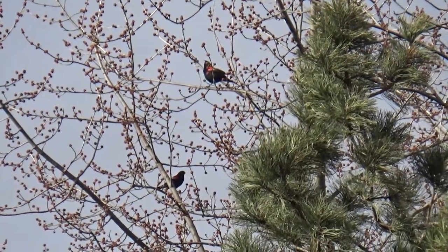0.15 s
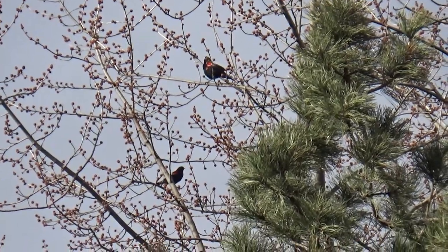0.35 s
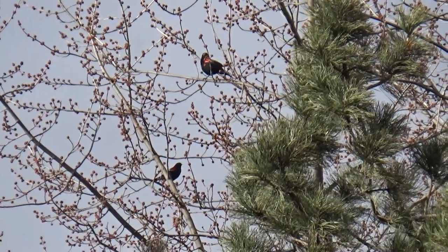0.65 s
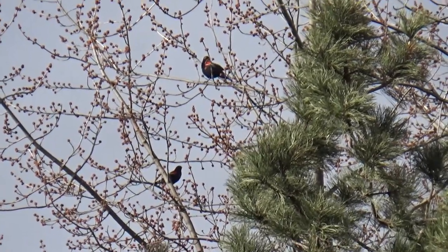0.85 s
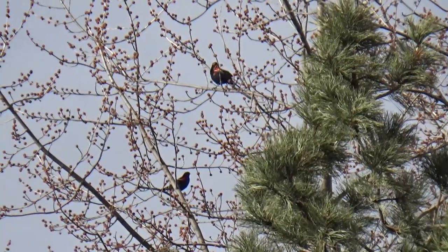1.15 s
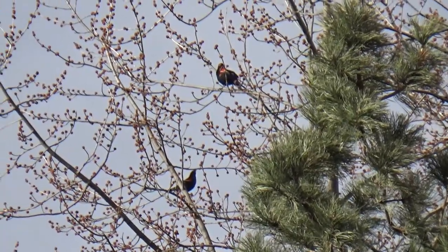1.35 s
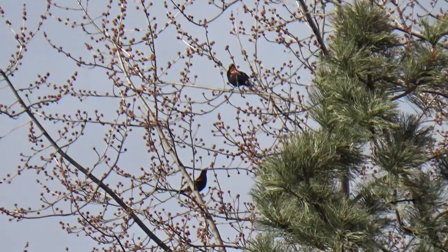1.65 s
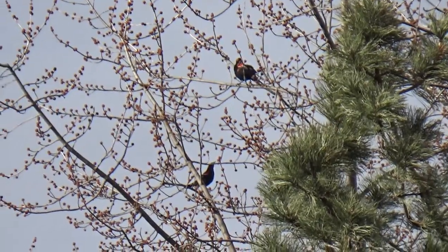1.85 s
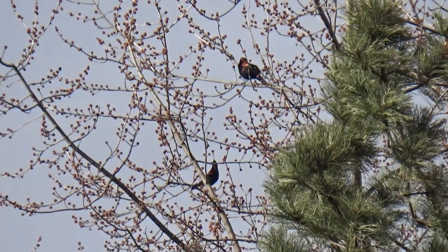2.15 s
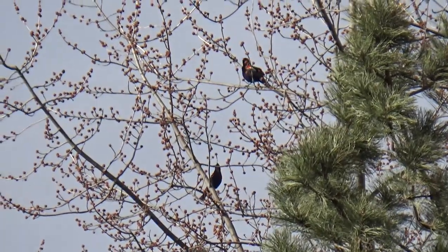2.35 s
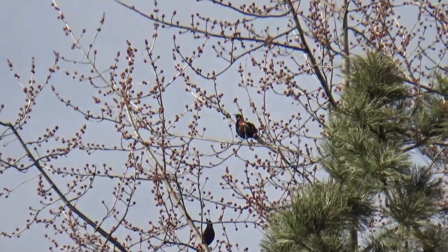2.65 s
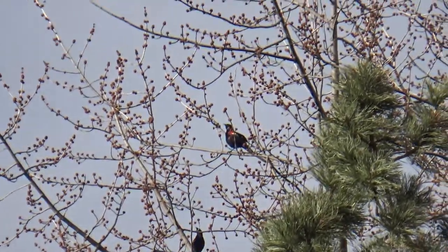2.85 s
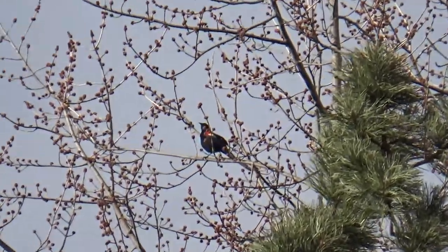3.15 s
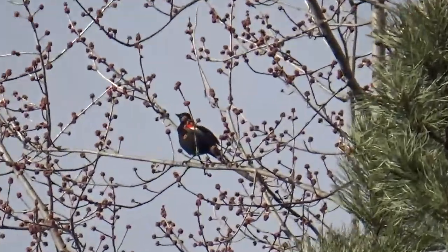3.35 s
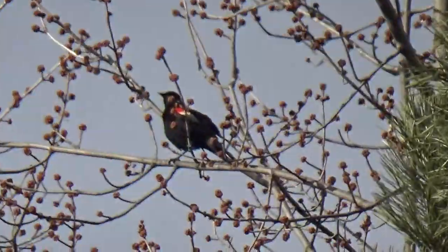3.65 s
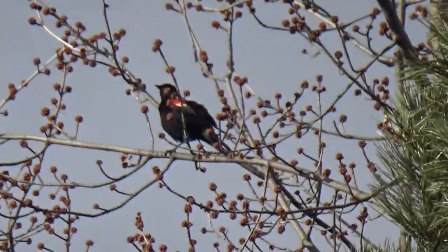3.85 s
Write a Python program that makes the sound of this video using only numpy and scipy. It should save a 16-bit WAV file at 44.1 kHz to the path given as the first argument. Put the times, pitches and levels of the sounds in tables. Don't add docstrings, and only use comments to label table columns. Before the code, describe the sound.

A blackbird in bare trees finishes its song with a harsh, rapid buzzing trill lasting just over half a second; afterwards a car recedes over low traffic, with camera ticks, a tiny chip and faint far whistles.

```python
import sys
import numpy as np
from scipy import signal
from scipy.fft import rfft, irfft
from scipy.io import wavfile
from scipy.ndimage import uniform_filter1d

SR = 44100
rng = np.random.default_rng(int(sys.argv[2]) if len(sys.argv) > 2 else 0)


def gain_from_db(level_db):
    decades = np.asarray(level_db, float) / 20
    return 10 ** decades


def pcm_store(signal):
    levels = np.round(np.clip(np.atleast_2d(signal), -1, 1) * 32767)
    wavfile.write(sys.argv[1], SR, levels.astype(np.int16).T)


N = 176400

# [f/Hz, level/dB per Hz]
TRAFFIC_COLOUR = [(25, -21), (70, -15), (210, 0.5), (420, -4.5), (700, -4), (1300, -9.5), (2500, -18),
                  (5000, -50)]
# [f/Hz, level/dB per Hz]
BREEZE_COLOUR = [(1500, 4), (3500, 1), (5500, -5), (8500, -3.5), (11000, -16), (15500, -12.5)]
# [t/s, level/dB]
BREEZE_FADER = [(0, -56), (.7, -63.5), (1.6, -65.5), (2.6, -67.5), (4, -66)]
# [f/Hz, correlation]
EAR_LIKENESS = [(60, 0.97), (300, 0.99), (700, 0.97), (1500, 0.58), (3500, 0.079), (7000, 0.58),
                (9000, 0.8), (11000, 1)]
# [t/s, level/dB, centre of tyre roar f/Hz]
CAR_PASSAGE = [
    (0, -53.5, 748),
    (.6, -50, 852.6),
    (1.2, -52.5, 1050),
    (1.8, -55.5, 1150),
    (2.4, -57, 1193),
    (3, -61.5, 1087),
    (4, -61.5, 1104),
]
# [f/Hz, level/dB per Hz]
CAR_COLOUR = [(100, -19.5), (500, -7), (1000, 0), (2000, -12.5), (3500, -23.5), (7000, -35)]
# [t/s, level/dB]
WIND_PUFFS = [
    (0.211, -42.5),
    (0.859, -49),
    (1.171, -47),
    (2.719, -56),
    (2.949, -61.5),
    (3.539, -65),
    (3.639, -54.5),
    (3.74, -49.5),
    (3.979, -123),
]
# [t/s, level/dB, ring f/Hz, crack level/dB, crack top f/Hz]
CAMERA_TICKS = [
    (.7894, -30, 8200, -5, 15000),
    (1.3995, -39, 5500, 2, 10500),
    (1.4648, -39, 4400, 2, 10000),
    (2.8912, -35, 1680, -4, 3000),
    (2.957, -45, 4700, -2, 7500),
    (3.708, -45, 6300, -1, 9000),
]
# [t/s, level/dB]
ZOOM_FADER = [
    (0, -64),
    (2.8, -75),
    (3, -72),
    (3.3, -85.5),
    (3.75, -65),
    (3.9, -89),
    (4, -154),
]
# [t/s, length/s, first f/Hz, last f/Hz, level/dB]
FAR_WHISTLES = [
    (3.652, .115, 2420, 2370, -63),
    (3.815, .08, 1270, 1230, -63),
    (3.927, .036, 2410, 2510, -45),
    (3.95, .075, 2540, 2510, -50),
    (3.965, .05, 2400, 2300, -57),
    (3.94, .045, 3760, 3800, -62),
    (3.93, .02, 7300, 7200, -70),
]
# [first f/Hz, last f/Hz, level/dB]
CHIP_PARTIALS = [(4150, 4550, -1), (3650, 3850, -10), (3000, 3150, -14), (8100, 8300, -26),
                 (12200, 12100, -25)]
# [t/s, length/s, first f/Hz, last f/Hz, level/dB]
LEAD_IN_NOTES = [
    (-.02, .045, 3300, 2620, -40),
    (-.02, .039, 4300, 5350, -45),
    (.0168, .008, 4100, 5450, -33),
    (.0235, .007, 3560, 3480, -28),
    (.031, .006, 4900, 3400, -27),
    (.024, .011, 7300, 6700, -54),
]
# [share of the beat, pitch f/Hz, level/dB]
TRILL_BEAT = [(0, 2868, -8.5), (.13, 2945, 4.5), (0.191, 5256, -3), (.3, 3565, -4.5), (.38, 4643, -2.5),
              (.47, 5267, -13), (.56, 5092, -5), (.7, 3429, 3), (0.789, 2903, -3), (.87, 2745, -2.5),
              (0.951, 2427, -7.5)]
OVERTONES = (-18.5, -23.5)
# [f/Hz, gain/dB]
THROAT_COLOUR = [(1800, -6), (2350, 5.5), (2850, -3.5), (4200, -4.5), (5300, 2), (5700, 2.5), (7000, -24)]
# [f/Hz, gain/dB]
SHEEN_COLOUR = [(5000, -3.5), (6800, -5.5), (7900, -13.5), (8700, -3), (9400, -1.5), (10500, -40),
                (13000, -20), (15000, -8)]
# [f/Hz, width/Hz, boost/dB]
TRILL_PEAKS = [(2345, 70, 3), (2700, 70, 5), (2880, 70, 6), (3510, 70, 7), (4830, 150, 2), (5230, 150, 5)]

TRAFFIC_DB, TRAFFIC_FOLLOWS = -52, 0.55
CAR_WIDTH_HZ, CAR_PAN_DB, ROAR_DB = 403, -8.5, -4.5
PUFF_S, PUFF_HZ = 0.037, (67, 159)
TICK_T60_S, RING_CYCLES, TICK_RISE_S = .02, 20., .0004
ZOOM_HZ, ZOOM_WIDTH_HZ = 9000, 3000
WHINE_HZ, WHINE_DB = 7900, -81
GROUND_S, GROUND_DB = .00594, -4.5
TWIGS_DB, TWIGS_T60_S = -8, .08
WALLS_DB, WALLS_T60_S, WALLS_CUT_HZ = -18, .5, 2500
FAR_FLUTTER_DB, NEIGHBOUR_WET_DB = 3, 8
CHIP_START_S, CHIP_LENGTH_S, CHIP_DB, CHIP_ROUGH = 2.003, .022, -40.5, .45
CHIP_BREATH_DB, CHIP_BREATH_HZ = -10, (3200, 5000)
BEATS_PER_S, SLOWING_PER_S2, BEAT_PHASE = 69.48, 7.81, -.836
PITCH_WOBBLE, LEVEL_WOBBLE_DB, TIMING_WOBBLE, SLOW_WANDER = .011, 1.5, .018, .006
TRILL_START_S, TRILL_END_S, ATTACK_S, RELEASE_S = .035, .612, .005, .02
TRILL_DB, SINGER_PAN_DB = -32.5, 3
PEAK_EFFORT_S, EARLY_FLAT, LATE_FLAT = .21, .05, .02
WARM_UP_S, WARM_UP_LOW_DB = .06, -7
TOP_HZ = 15780


def rms_one(x):
    return x / np.sqrt(np.mean(x ** 2) + 1e-20)


def in_time(rows):
    s, *columns = np.transpose(rows)
    return [np.interp(np.arange(N) / SR, s, c) for c in columns]


def at_hz(points, hz):
    f, value = np.transpose(points)
    return np.interp(np.log(hz), np.log(f), value)


def drift(rate_hz):
    r = np.exp(-16 * np.pi * rate_hz / SR)
    slow = signal.lfilter([1], [1, -2 * r, r * r], rng.standard_normal(N // 8 + 8002))
    slow = slow[8000:]
    return np.interp(np.arange(N) / 8, np.arange(len(slow)), rms_one(slow - slow.mean()))


def resonance(x, hz, width_hz):
    r = np.exp(-np.pi * width_hz / SR)
    zeros = np.array([1, 0, -1]) * (1 - r * r) / 2
    poles = [1, -2 * r * np.cos(2 * np.pi * hz / SR), r * r]
    return signal.lfilter(zeros, poles, x + 1e-18)


def band(x, low_hz, high_hz):
    sos = signal.butter(2, [low_hz, high_hz], "band", fs=SR, output="sos")
    return signal.sosfilt(sos, x + 1e-18)


def pan(x, db):
    return x * gain_from_db(np.array([[db / 2], [-db / 2]]))


def banded_noise(colour, patchy_db):
    out, together = 0, drift(2.5)
    edges = 22 * 2 ** np.arange(0, 9.6, .5)
    white = rng.standard_normal((2, 2, N))
    lowest, highest = colour[0][0], colour[-1][0]
    for k, (low, high) in enumerate(zip(edges, edges[1:])):
        hz = np.sqrt(low * high)
        if not lowest / 4 < hz < highest * 2:
            continue
        mid, side = band(white[k % 2], low, high)
        alike = np.clip(at_hz(EAR_LIKENESS, hz), -1, 1)
        outside = -12 * abs(np.log2(hz / np.clip(hz, lowest, highest)))
        flicker = patchy_db * (0.2 * together + drift(6.9))
        gain = gain_from_db(at_hz(colour, hz) + outside + flicker)
        out = out + gain * (np.sqrt(1 + alike) * mid + np.sqrt(1 - alike) * side * [[1], [-1]])
    return rms_one(out)


def glide(s, length, first_hz, last_hz, db):
    out = np.zeros(N)
    i = np.arange(max(int(s * SR) + 1, 0), min(int((s + length) * SR), N))
    u = (i / SR - s) / length
    hump = np.sin(np.pi * u ** .8) ** .8
    pitch = last_hz + (first_hz - last_hz) * (1 - u) ** 2
    out[i] = gain_from_db(db + 3) * hump * np.sin(2 * np.pi * np.cumsum(pitch) / SR)
    return out


def trees(x, wet_db):
    t = np.arange(SR // 2) / SR
    sparse = rng.standard_normal(len(t)) * (rng.random(len(t)) < .03)
    twigs = sparse + 0.28 * 0.19 * rng.standard_normal((2, len(t)))
    twigs = twigs * gain_from_db(-60 * t / TWIGS_T60_S) * (t > .001)
    walls = rng.standard_normal((2, len(t))) * gain_from_db(-60 * t / WALLS_T60_S) * (t > .015)
    walls = signal.lfilter([1], [1, -np.exp(-2 * np.pi * WALLS_CUT_HZ / SR)], walls)
    echo = gain_from_db(TWIGS_DB) * twigs / np.sqrt(np.sum(twigs[0] ** 2))
    echo = echo + gain_from_db(WALLS_DB + wet_db) * walls / np.sqrt(np.sum(walls[0] ** 2))
    echo[:, round(GROUND_S * SR)] += gain_from_db(GROUND_DB)
    return x + signal.fftconvolve(x[None], echo, axes=1)[:, :N]


def distant_traffic(car_db):
    level_db = TRAFFIC_DB + TRAFFIC_FOLLOWS * (car_db - car_db.mean())
    return gain_from_db(level_db) * banded_noise(TRAFFIC_COLOUR, patchy_db=0.97)


def breeze():
    level_db, = in_time(BREEZE_FADER)
    return gain_from_db(level_db + 6) * banded_noise(BREEZE_COLOUR, patchy_db=0)


def car(level_db, roar_hz):
    sos = signal.butter(2, CAR_WIDTH_HZ / 2, fs=SR, output="sos")
    low = signal.sosfilt(sos, rng.standard_normal((2, N)))
    turn = 2 * np.pi * np.cumsum(roar_hz) / SR
    roar = rms_one(low[0] * np.cos(turn) + low[1] * np.sin(turn))
    roar = roar * gain_from_db(ROAR_DB + 0.83 * drift(21))
    body = banded_noise(CAR_COLOUR, patchy_db=-2.37)
    return pan(gain_from_db(level_db) * (roar + body), CAR_PAN_DB)


def wind():
    t, white = np.arange(N) / SR, rng.standard_normal((3, N))
    shape = sum(gain_from_db(db - 3.5) * np.sin(np.pi * np.clip((t - s) / PUFF_S, 0, 1)) for s, db in WIND_PUFFS)
    rumble = band(white[0] + 0.37 * white[1:], *PUFF_HZ)
    return shape * rms_one(band(rumble, *PUFF_HZ))


def camera_ticks():
    out, t = np.zeros(N), np.arange(SR // 40) / SR
    for s, db, hz, crack_db, top_hz in CAMERA_TICKS:
        top_hz = min(top_hz, 18000)
        crack = rng.standard_normal(len(t)) * gain_from_db(-60 * t / TICK_T60_S)
        crack = band(band(crack, 1500, top_hz), 900, top_hz)
        ring = np.sin(2 * np.pi * hz * t) * gain_from_db(-60 * t * hz / RING_CYCLES)
        rise = np.minimum(t / TICK_RISE_S, 1)
        out[int(s * SR):int(s * SR) + len(t)] += gain_from_db(db) * rise * (gain_from_db(crack_db) * crack + ring)
    return out


def camera_motor():
    white = rng.standard_normal((2, N))
    zoom = resonance(white[0], ZOOM_HZ, ZOOM_WIDTH_HZ)
    zoom = rms_one(resonance(zoom, ZOOM_HZ, ZOOM_WIDTH_HZ))
    whine = rms_one(resonance(resonance(white[1], WHINE_HZ, 80), WHINE_HZ, 80))
    return gain_from_db(in_time(ZOOM_FADER)[0]) * zoom + gain_from_db(WHINE_DB) * whine


def far_song():
    return gain_from_db(FAR_FLUTTER_DB * drift(60.2)) * sum(glide(*row) for row in FAR_WHISTLES)


def chip():
    u = np.clip((np.arange(N) / SR - CHIP_START_S) / CHIP_LENGTH_S / 1.68, 0, 1)
    breath = rms_one(band(rng.standard_normal(N), *CHIP_BREATH_HZ))
    call = breath * np.sin(np.pi * u) * gain_from_db(CHIP_DB + CHIP_BREATH_DB)
    for first_hz, last_hz, db in CHIP_PARTIALS:
        partial = glide(CHIP_START_S, CHIP_LENGTH_S, first_hz, last_hz, CHIP_DB + db)
        call = call + partial * (1 + CHIP_ROUGH * drift(234))
    return call


def singer():
    t = np.arange(N) / SR
    beat = BEAT_PHASE + BEATS_PER_S * t - SLOWING_PER_S2 * t * t / 2
    beat = (beat + TIMING_WOBBLE * drift(43)) % 1
    share, hz, db = np.transpose(TRILL_BEAT)
    pitch = uniform_filter1d(np.interp(beat, share, hz, period=1), size=13)
    pitch = pitch * (1 + PITCH_WOBBLE * drift(120) + SLOW_WANDER * drift(4.5))
    flat = np.interp(t, [TRILL_START_S, PEAK_EFFORT_S, TRILL_END_S], [EARLY_FLAT, 0, LATE_FLAT])
    pitch = pitch - flat * 2 * np.maximum(pitch - 3000, 0)
    turn = 2 * np.pi * np.cumsum(pitch) / SR

    attack = np.clip((t - TRILL_START_S) / ATTACK_S, 0, 1)
    release = np.clip(1 - (t - TRILL_END_S) / RELEASE_S, 0, 1)
    beat_db = np.interp(beat, share, db, period=1) + LEVEL_WOBBLE_DB * drift(300)
    shape = attack * release * gain_from_db(TRILL_DB + 6 + beat_db)
    warm_up_db = WARM_UP_LOW_DB * (t < WARM_UP_S) * (pitch < 3200)
    trill = np.sin(turn) * shape * gain_from_db(warm_up_db)
    trill = trill + sum((gain_from_db(g) - 1) * resonance(trill, f, w) for f, w, g in TRILL_PEAKS)
    sheen = gain_from_db(OVERTONES[0]) * np.sin(2 * turn) + gain_from_db(OVERTONES[1]) * np.sin(3 * turn)

    hz = np.maximum(np.arange(N // 2 + 1) * SR / N, 1)
    voice = rfft(trill) * gain_from_db(at_hz(THROAT_COLOUR, hz))
    voice = voice + rfft(sheen * shape) * gain_from_db(at_hz(SHEEN_COLOUR, hz))
    return irfft(voice, N) + sum(glide(*row) for row in LEAD_IN_NOTES)


def scene():
    car_db, roar_hz = in_time(CAR_PASSAGE)
    background = distant_traffic(car_db) + breeze() + car(car_db, roar_hz)
    handling = wind() + camera_ticks() + camera_motor()
    neighbour = trees(chip() + far_song(), NEIGHBOUR_WET_DB)
    blackbird = pan(trees(singer(), 0), SINGER_PAN_DB)
    return background + handling + neighbour + blackbird


def roll_off(x):
    return signal.sosfilt(signal.butter(12, 16550, fs=SR, output="sos"), x)


def record(dry):
    kept = np.arange(N // 2 + 1) * SR / N < TOP_HZ
    mix = irfft(rfft(dry) * kept, N)
    return roll_off(mix)


dry = scene()
out = record(dry)
pcm_store(out)
```